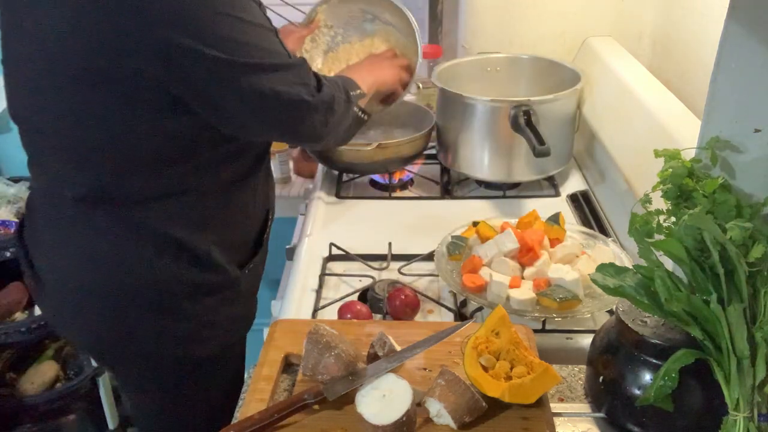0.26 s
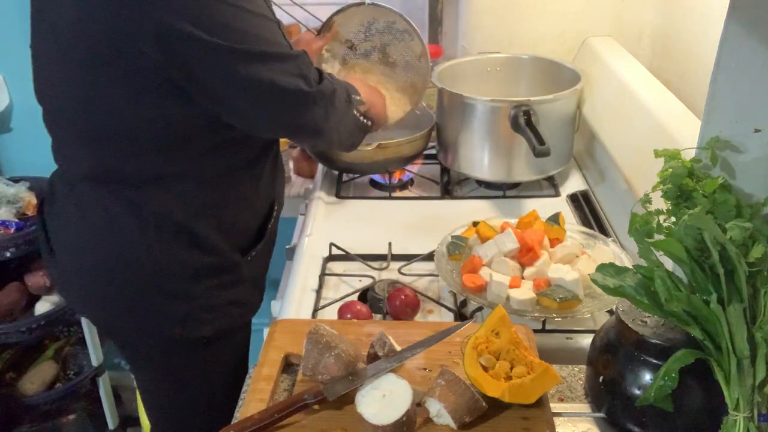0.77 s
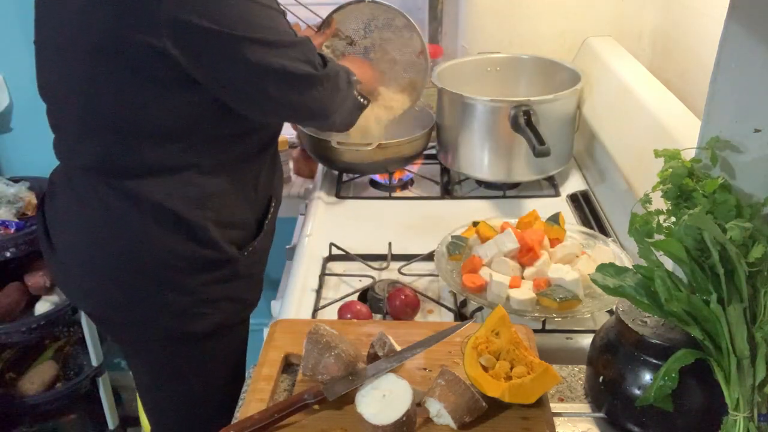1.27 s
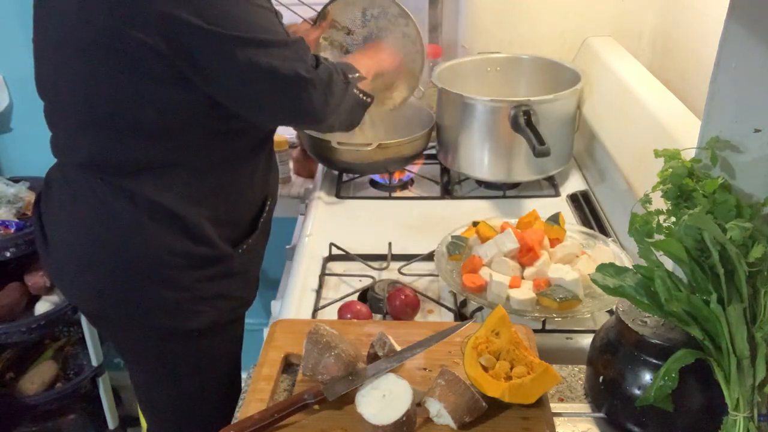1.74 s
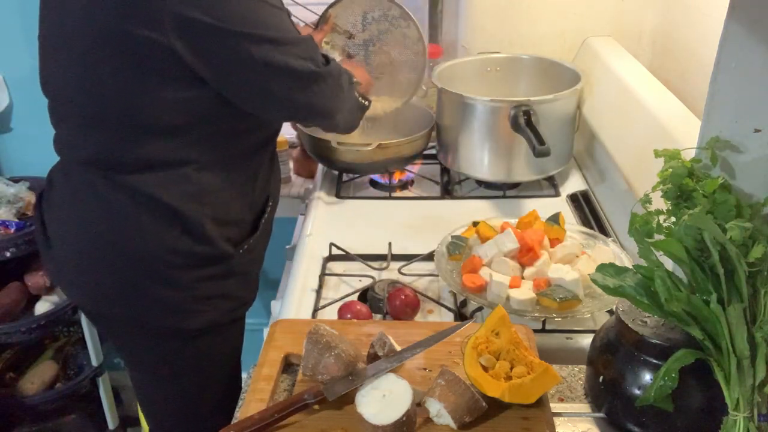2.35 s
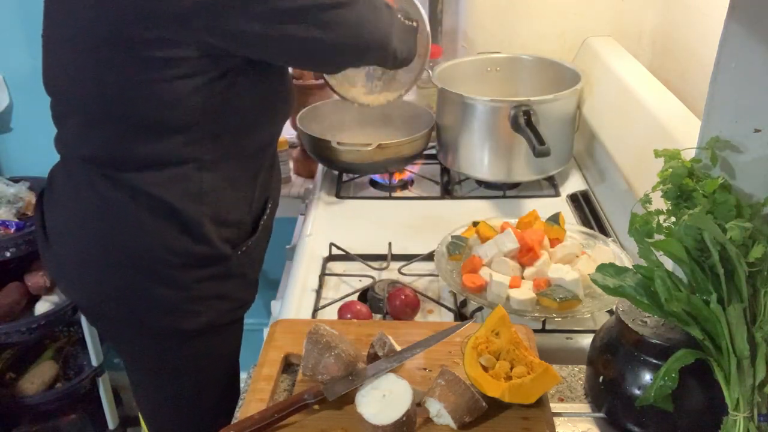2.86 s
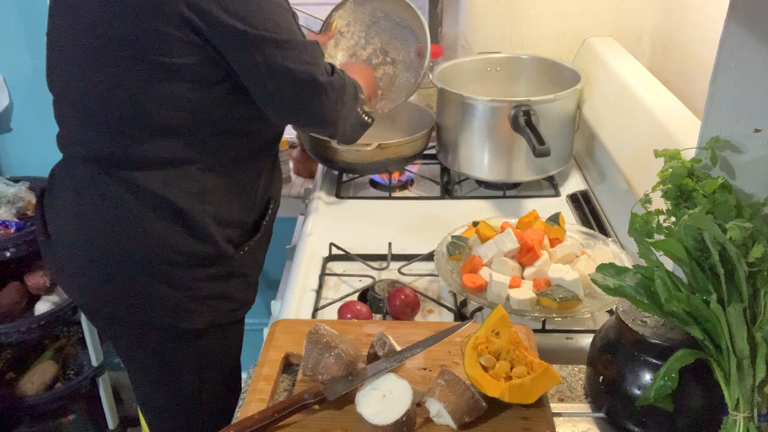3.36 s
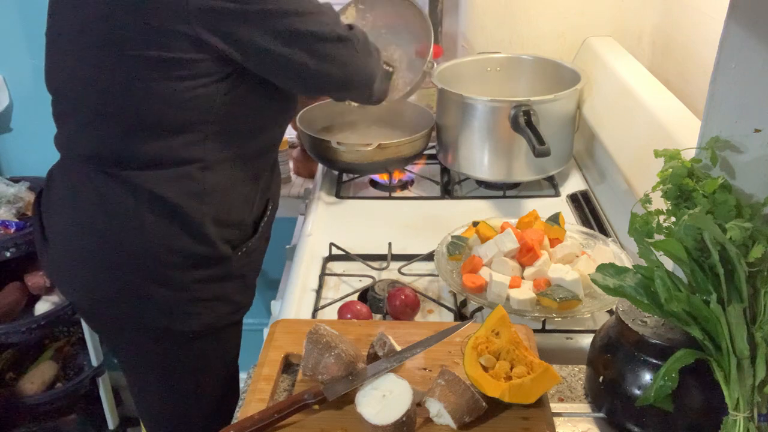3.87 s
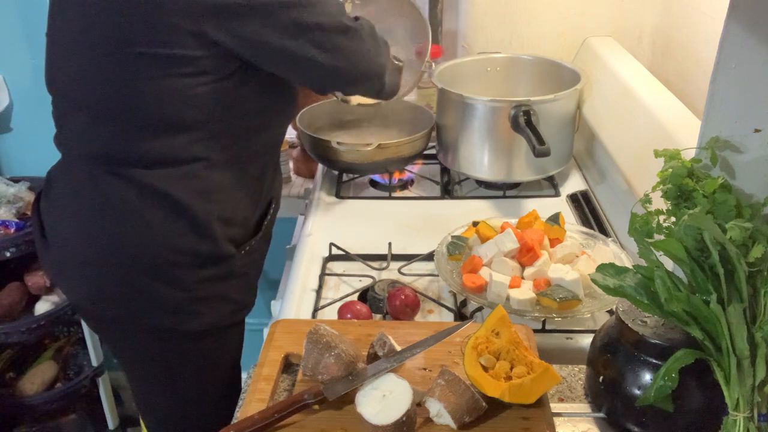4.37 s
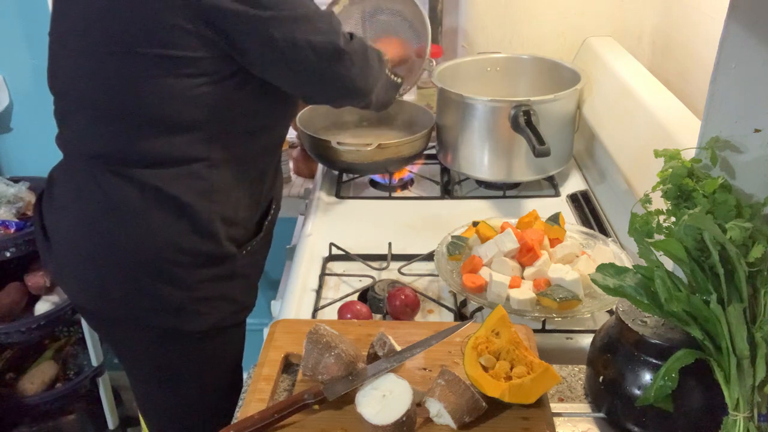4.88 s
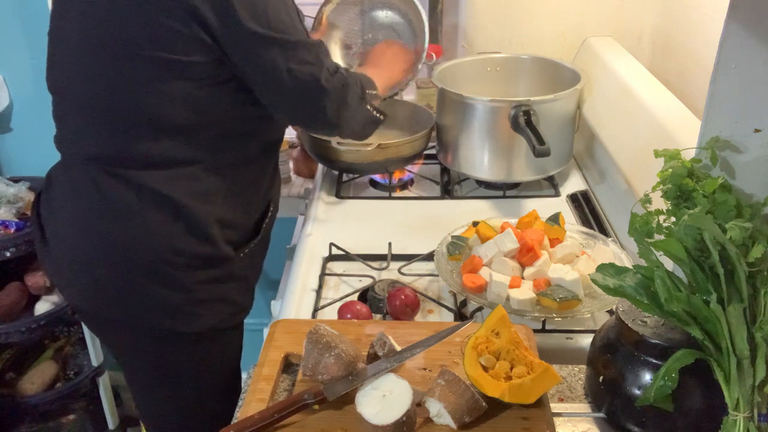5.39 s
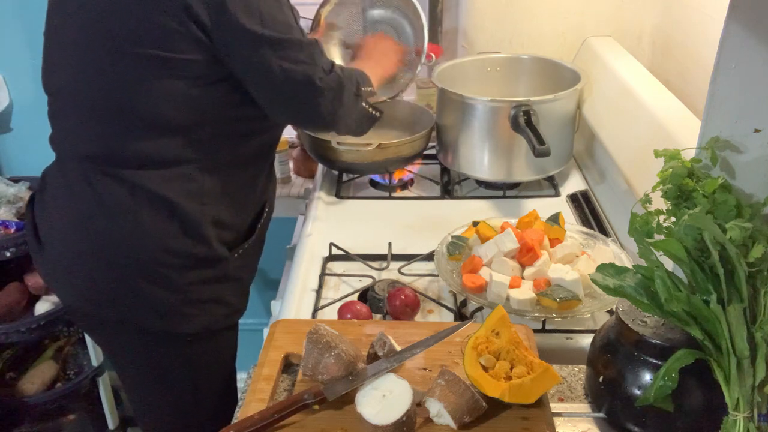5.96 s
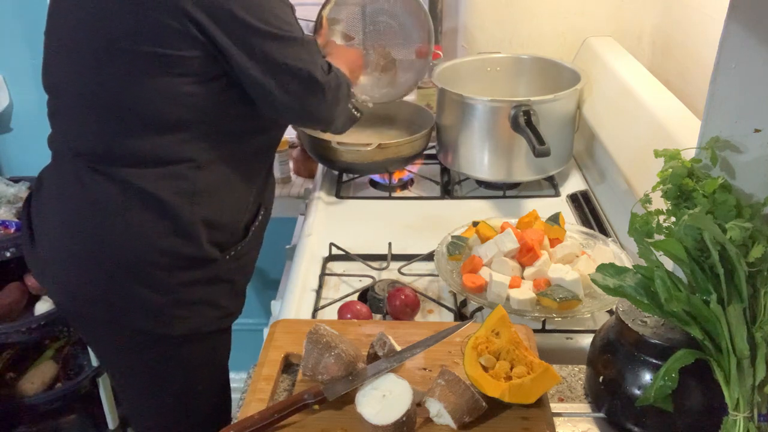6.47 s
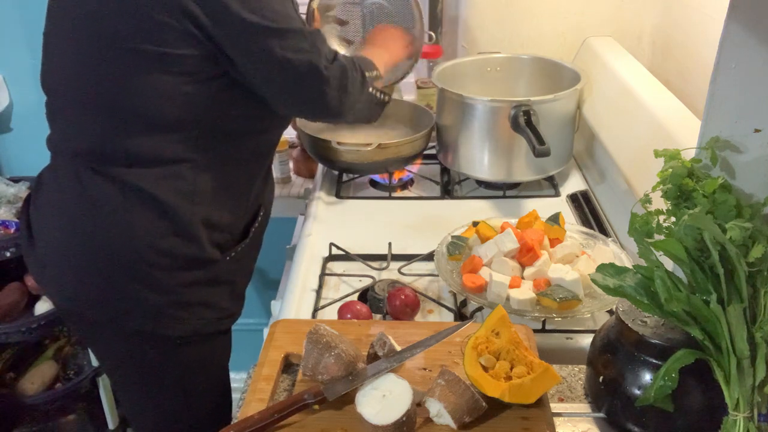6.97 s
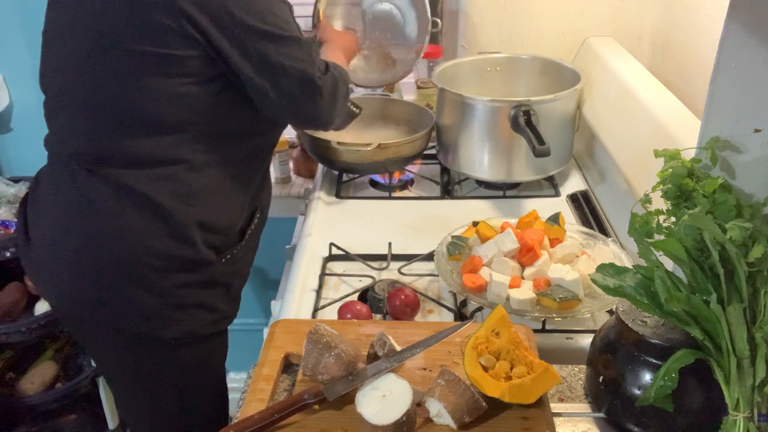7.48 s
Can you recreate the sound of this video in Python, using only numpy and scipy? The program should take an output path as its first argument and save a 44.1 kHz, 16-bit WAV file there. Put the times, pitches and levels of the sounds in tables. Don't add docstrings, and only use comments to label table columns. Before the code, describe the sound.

Wet rice is wiped and flicked by hand off a steel mesh strainer, with rim taps and a sharp clang over a softly roaring gas flame.

```python
import sys
import numpy as np
from scipy import signal
from scipy.fft import rfft, irfft, next_fast_len
from scipy.io import wavfile
from scipy.ndimage import uniform_filter1d, map_coordinates

SR = 44100
rng = np.random.default_rng(int(sys.argv[2]) if len(sys.argv) > 2 else 0)


def to_wav(s):
    ch = np.atleast_2d(s).T
    pcm = np.round(np.clip(ch, -1, 1) * 32767)
    wavfile.write(sys.argv[1], SR, pcm.astype(np.int16))


def gain_from_db(level_db):
    decades = np.asarray(level_db, float) / 20
    return 10 ** decades


N = 340893
T = np.arange(N) / SR


def unit(x):
    return x / np.sqrt(np.mean(x ** 2) + 1e-20)


def along(points, hz):
    f, v = np.transpose(points)
    return np.interp(np.log(hz + 1), np.log(f + 1), v)


def curves(rows):
    s, *cols = np.transpose(rows)
    return [np.interp(T, s, c) for c in cols]


def wobble(rate):
    knots = rng.standard_normal(int(N * rate / SR) + 4)
    return map_coordinates(knots, [T * rate])


def filtered(x, response):
    m = next_fast_len(N + SR // 2)
    return irfft(rfft(x, m) * response(np.fft.rfftfreq(m, 1 / SR)), m)[..., :N]


def add(track, s, sound):
    part = track[:, round(s * SR):][:, :sound.shape[-1]]
    part += sound[..., :part.shape[1]]


def kitchen(x, wet_db):
    # f/Hz, t60/s
    room_decay = [(500, 0.53), (2000, 0.34), (6000, 0.42), (12000, 0.26)]
    hz, t, z = signal.stft(rng.standard_normal((2, SR // 2)), SR, nperseg=256)
    fade = gain_from_db(-60 * t / along(room_decay, hz)[:, None])
    tail = signal.istft(z * fade, SR, nperseg=256)[1]
    late_tail = np.pad(tail, ((0, 0), (130, 0)))
    wet = signal.fftconvolve(x, late_tail / np.linalg.norm(tail[0]), axes=1)
    return x + gain_from_db(wet_db) * wet[:, :x.shape[1]]


def ticks(spectrum, scatter_db, patchy_db, size=(7, 5)):
    sizes = gain_from_db(scatter_db * np.clip(rng.standard_normal(N), -2.5, 2.5))
    z = signal.stft(sizes * rng.standard_normal((2, N)), nperseg=512)[2]
    field = uniform_filter1d(rng.standard_normal(z.shape[1:]), size=size[0], axis=0)
    field = uniform_filter1d(field, size=size[1], axis=1)
    patched = signal.istft(z * gain_from_db(patchy_db * unit(field)), nperseg=512)[1][:, :N]
    return unit(filtered(patched, lambda hz: gain_from_db(along(spectrum, hz))))


def room():
    # f/Hz, level per Hz/dB
    roar_spectrum = [(22, -43), (45, -3), (82, -7.5), (120, 0), (200, -10), (380, -10.5), (480, -10.5),
                     (900, -17.5), (1300, -19), (2600, -26.5), (5000, -29.5), (7000, -31.5), (11500, -31),
                     (14500, -55)]
    # f/Hz, width/Hz, level/dB
    room_tones = [(62, 17, -1), (90, 4.4, 4.5), (143.7, 32, -0.5), (247, 8.2, -4.5), (281.5, 9.8, 2.5),
                  (316, 20, -2), (351.5, 22, -1), (698, 176, -6), (2300, 320, -23.5)]
    # t/s, level/dB
    swell = [(0.0, -47), (0.34, -56), (1.08, -49), (3.18, -43), (3.53, -46), (3.66, -38), (4.07, -44),
             (4.28, -45), (4.56, -45), (4.97, -47), (5.55, -48), (6.26, -43), (6.78, -55), (7.15, -49),
             (7.34, -49), (7.73, -55)]
    whine_hz = (2162, 2078)
    # t/s, level of the first/dB, level of the second/dB
    whine_levels = [(0, -64.5, -97), (1, -73.5, -68), (2.5, -72, -70.5), (4, -81, -65), (6, -69, -65),
                    (7.73, -65.5, -69)]

    def roar_response(f):
        power = gain_from_db(2 * along(roar_spectrum, f))
        for centre, width, db in room_tones:
            power = power + gain_from_db(2 * db) / (1 + (2 * (f - centre) / width) ** 2) ** 2
        return np.sqrt(power)

    hiss = ticks([(1, 0)], scatter_db=0, patchy_db=1.86, size=(2, 22))
    roar = unit(filtered(hiss, roar_response))
    flutter = gain_from_db(0.31 * (curves(swell)[0] + 52.5))
    low = filtered(roar, lambda f: 1 / (1 + (f / 200) ** 2))
    whine = np.zeros(N)
    for hz, db in zip(whine_hz, curves(whine_levels)):
        strength = gain_from_db(db + 1.2 * wobble(5))
        whine += strength * np.sin(2 * np.pi * hz * T + 0.37 * wobble(4.3))
    return gain_from_db(-45.5) * (roar + low * (flutter - 1)) + whine


def strokes(rows, rise_db, fall_db):
    pair = np.zeros((2, N))
    for s, hold, db, coarse_db in rows:
        near = slice(max(round((s - .4) * SR), 0), round((s + hold + .4) * SR))
        build = rise_db * np.maximum(s - T[near], 0)
        release = fall_db * np.maximum(T[near] - s - hold, 0)
        pair[:, near] += gain_from_db(db - build - release) * gain_from_db([[0], [coarse_db]])
    return pair


def scraping():
    # f/Hz, level/dB
    wires = [(5000, -32), (7200, -16), (8200, -10), (9200, -6), (10300, -2), (11600, 0), (13000, -5),
             (14500, -11.5), (16000, -22)]
    # f/Hz, level/dB
    grains = [(1200, -33), (2500, -10.5), (3300, -5.5), (4000, -4), (4800, -3.5), (6000, -3), (7000, -6.5),
              (8500, 2), (11000, -32)]
    # t/s, hold/s, pressure level/dB, coarse over fine level/dB
    wipes = [(0.143, 0.17, -60, 0.5), (0.407, 0.089, -62.5, 1.5), (0.563, 0.028, -63, -5.7),
             (0.691, 0.14, -53.5, 0), (0.93, 0.15, -53, 1.3), (1.167, 0.08, -56.5, -5),
             (1.313, 0.06, -55.5, 0.5), (1.482, 0.085, -49.9, 0.8), (1.632, 0.19, -53, 0),
             (1.97, 0.079, -64, -0.8), (2.103, 0.083, -51, 0.5), (2.321, 0.0088, -49.5, -0.5),
             (2.434, 0.052, -47, 2), (2.594, 0.038, -50, 0), (2.782, 0.023, -54, -1.5)]
    # t/s, hold/s, pressure level/dB, coarse over fine level/dB
    flicks = [(2.918, 0.013, -59.8, -30), (3.006, 0.094, -46, -10), (3.198, 0.14, -41, -5),
              (3.514, 0.088, -53, -25), (3.729, 0.048, -42, -14), (3.849, 0.11, -43.5, -11),
              (4.106, 0.034, -50.5, -30), (4.239, 0.12, -42.6, -10.5), (4.444, 0.1, -52, -17),
              (4.66, 0.024, -45.5, -15), (4.925, 0.058, -49, -6.5), (5.153, 0.002, -55, -1),
              (5.256, 0.076, -44.5, -8), (5.599, 0.004, -42.5, -4.5), (5.851, 0.006, -53.8, -9),
              (6.043, 0.029, -62.5, 1), (6.36, 0.084, -50, 1), (6.611, 0.053, -50.5, 0),
              (6.761, 0.04, -46, 0.5), (7.019, 0.005, -71, -0.9), (7.135, 0.008, -53.8, -0.0),
              (7.201, 0.033, -48.5, -1), (7.295, 0.054, -50, -2), (7.54, 0.007, -48.5, 0),
              (7.691, 0.005, -59, -8.9)]
    # t/s, hold/s, pressure level/dB, coarse over fine level/dB
    resting = [(2.914, 3.956, -62, 4)]
    # t/s, peak level/dB, coarse
    # part level/dB
    clumps = [(0.6649, -41, -18), (0.7917, -23, -11), (0.94, -36, 15), (1.2451, -31, -21), (1.33, -30, -6),
              (1.484, -42, -17), (2.3136, -32, 2), (2.4314, -28, 5), (2.7696, -40, -7), (3.2106, -18, -29),
              (3.7823, -17, -10), (4.595, -14, -9), (5.1482, -32, -5), (5.5902, -29, -15),
              (7.014, -28.5, -2), (7.3537, -37, -19)]
    clump_t60_s, clump_rise_s = 0.083, 0.00061

    hand = strokes(wipes, rise_db=165, fall_db=193)
    hand = hand + strokes(flicks + resting, rise_db=420, fall_db=258)
    jerk_db = 1.1 * wobble(25) + 1.3 * wobble(90)
    fine, coarse = hand * gain_from_db(jerk_db) * gain_from_db([[1.2], [-.6]])
    for s, db, coarse_part_db in clumps:
        age = np.maximum(T - s, 0)
        burst = gain_from_db(db - 20.5 - 60 * age / clump_t60_s) * (1 - np.exp(-age / clump_rise_s))
        fine = fine + burst
        coarse = coarse + burst * gain_from_db(coarse_part_db)
    hiss = fine * ticks(wires, scatter_db=2.5, patchy_db=2.0)
    rustle = coarse * ticks(grains, scatter_db=2.0, patchy_db=2.26)
    return kitchen(hiss + rustle, wet_db=-12.5)


def squeaks():
    # t/s, length/s, slip rate f/Hz, level/dB, brightest f/Hz
    slips = [
        (.93, 0.024, 1650, -53.5, 5000),
        (7.013, 0.02, 2410, -55.5, 4750),
        (7.121, 0.03, 2330, -54.5, 4650),
        (7.194, .02, 1770, -56.5, 1760),
        (7.211, 0.027, 2066, -47, 4360),
        (7.294, 0.023, 1780, -50, 5000),
        (7.339, 0.023, 1645, -49.5, 4940),
        (7.525, 0.053, 2370, -63, 4700),
    ]
    out = np.zeros((2, N))
    order = np.arange(1, 6)[:, None]
    for s, length, hz, db, bright_hz in slips:
        t = np.arange(round(length * SR)) / SR
        jitter = np.cumsum(0.04 * rng.standard_normal(SR // 10))[:len(t)]
        phase = 2 * np.pi * hz * t + jitter
        octaves_off = np.minimum(abs(np.log2(order * hz / bright_hz)), .8)
        stack = gain_from_db(-9 * octaves_off + 1.8 * (order == 1)) * np.sin(order * phase)
        add(out, s, gain_from_db(db) * np.sqrt(np.sin(np.pi * t / length)) * stack.sum(axis=0))
    return kitchen(out, wet_db=-5.0)


def ring(modes, spread_db, blur):
    t = np.arange(SR // 8) / SR
    hz, db, t60 = np.transpose(modes)[:, :, None]
    strength = spread_db * rng.standard_normal((2, len(modes), 1))
    drift = np.cumsum(blur * hz / 4000 * rng.standard_normal((len(modes), len(t))), axis=1)
    edge = signal.butter(2, [1400, 8000], "bandpass", fs=SR, output="sos")
    crack = 0.71 * signal.sosfilt(edge, gain_from_db(-60 * t / 0.0089) * rng.standard_normal((2, len(t))))
    waves = np.sin(2 * np.pi * hz * t + drift + 3 * strength)
    tones = np.sum(gain_from_db(db + strength - 60 * t / t60) * waves, axis=1)
    onset = 1 - np.exp(-t / 0.00068)
    return np.pad((tones + crack) * onset, ((0, 0), (0, SR // 4)))


def taps():
    # t/s, peak level/dB, tap's own low tone f/Hz, middle level/dB, high level/dB
    landings = [
        (2.7953, -28.5, 1810, -6.5, 1),
        (3.056, -36, 1896, 1.5, -2),
        (3.1025, -39.5, 1880, -6, -14),
        (3.4067, -40.5, 1840, -3, -2),
        (3.4548, -49, 2050, -10.5, -9),
        (3.7996, -50.5, 1950, -0.5, 2),
        (4.1647, -33.5, 1880, 5, 0),
        (4.5925, -35.5, 1850, 8, 5.5),
    ]
    # f/Hz, level/dB, t60/s
    rim_low = [(1523, -8, 0.059), (1625, 2, 0.033), (2050, -2, 0.033), (2320, -2, 0.089),
               (2815, -0.5, 0.028), (3170, -13, 0.048), (3380, 1, 0.024)]
    # f/Hz, level/dB, t60/s
    rim_middle = [(3610, -7, 0.014), (4070, -14, 0.016), (4490, 6, 0.05), (4584, -1.5, 0.037),
                  (4740, -2, 0.02), (4940, -8, 0.02)]
    # f/Hz, level/dB, t60/s
    rim_high = [(5400, -25, 0.0088), (6330, 5, 0.0087), (5720, -1, 0.027), (5810, -8, 0.024),
                (6370, -2.5, 0.079), (8100, -1, 0.027), (9960, -4, 0.029)]
    out = np.zeros((2, N))
    for s, db, hz, middle_db, high_db in landings:
        low = ring(rim_low + [(hz, 2, .05)], spread_db=1.0, blur=0.2)
        middle = gain_from_db(middle_db) * ring(rim_middle, spread_db=0.56, blur=0.22)
        high = gain_from_db(high_db) * ring(rim_high, spread_db=2.5, blur=0.061)
        blow = low + middle + high
        blow = 0.33 * blow + np.roll(blow, 120, axis=1)
        add(out, s, gain_from_db(db - 2) * kitchen(blow, wet_db=-5.0))
    return out


def clang():
    # t/s, level/dB
    contacts = [
        (6.116, -50),
        (6.123, -43),
        (6.1295, -37),
        (6.133, -21),
        (6.1356, -21),
        (6.1385, -20.5),
        (6.1445, -22),
        (6.157, -37),
        (6.192, -32.5),
    ]
    # f/Hz, level/dB, t60/s
    pan_modes = [(377, -21, 0.046), (600, -35, .04), (800, -32, 0.089), (1200, -27, 0.033),
                 (1810, -10, 0.059), (1968, -11.5, 0.14), (2050, -13, 0.13), (2160, -17, 0.034),
                 (3024, -12.5, 0.063), (3330, -12.5, 0.039), (4440, -7.5, 0.023), (4600, -14.5, 0.12),
                 (5480, 4, 0.012), (5680, -3, 0.015), (5520, -2.5, 0.049), (5980, -5, 0.054),
                 (6100, 4, 0.028), (6900, -21, 0.046), (8180, 4, 0.025), (8200, -6, .03), (9220, 12, 0.018),
                 (10570, -6, 0.018), (11930, -6, 0.026), (10630, -3, 0.036), (13300, -23, .02)]
    # t/s, f/Hz, level/dB, length/s
    thumps = [
        (6.17, 53, -40.5, 0.13),
        (6.137, 800, -39, 0.027),
        (6.135, 237, -42.5, 0.067),
        (2.83, 120, -43.5, 0.091),
        (2.8, 210, -45, 0.06),
    ]
    out = np.zeros((2, SR))
    first_s = contacts[0][0]
    for s, db in contacts:
        add(out, s - first_s, gain_from_db(db) * ring(pan_modes, spread_db=1.5, blur=0.12))
    track = np.zeros((2, N))
    add(track, first_s, kitchen(out, wet_db=-5))
    for s, hz, db, length in thumps:
        t = np.arange(round(length * SR)) / SR
        add(track, s, gain_from_db(db) * np.sin(np.pi * t / length) * np.sin(2 * np.pi * hz * t))
    return track


def scene():
    return room() + scraping() + squeaks() + taps() + clang()


def roll_off(x):
    return signal.sosfilt(signal.butter(12, 16460, fs=SR, output="sos"), x)


def record(dry):
    # f/Hz, likeness (0 to 1)
    alike = [(50, .98), (110, .93), (170, .78), (220, .5), (280, .8), (400, .25), (520, .75), (700, .9),
             (950, .2), (2100, .5), (2700, .2), (6900, .25), (7800, .92), (8500, .97), (9100, .99),
             (9500, .98), (10200, .9), (12700, .9), (13100, 1)]
    # f/Hz, level/dB
    louder = [(100, -1.5), (180, 4), (270, 14), (350, 8), (480, 0), (700, 0), (930, 4.5), (1100, 2),
              (2100, 4), (2800, 1.5), (4500, 3), (7000, 1.5), (8500, 0)]
    # f/Hz, phase/rad
    lead = [(50, .3), (110, .95), (300, 2), (520, 2.9), (900, 3.3), (1500, 2), (2200, -1), (5000, -.8),
            (6200, 1.6), (7200, 2.3), (8200, 2.7), (8700, 3.1), (9500, 3.2), (12900, 5.75), (13100, 6.283)]
    ports = filtered(dry, lambda hz: 1 / (1 + (hz / 15600) ** 24))

    def half(hz):
        return gain_from_db(along(louder, hz) / 2) * np.exp(.5j * along(lead, hz))

    def shares(hz):
        like = np.clip(along(alike, hz), 0, 1)
        return np.array([like, np.sqrt(1 - like ** 2)]) / half(hz)

    left = filtered(ports[0], half)
    right = filtered(ports, shares).sum(axis=0)
    return roll_off(np.array([left, right]))


dry = scene()
out = record(dry)
to_wav(out)
```